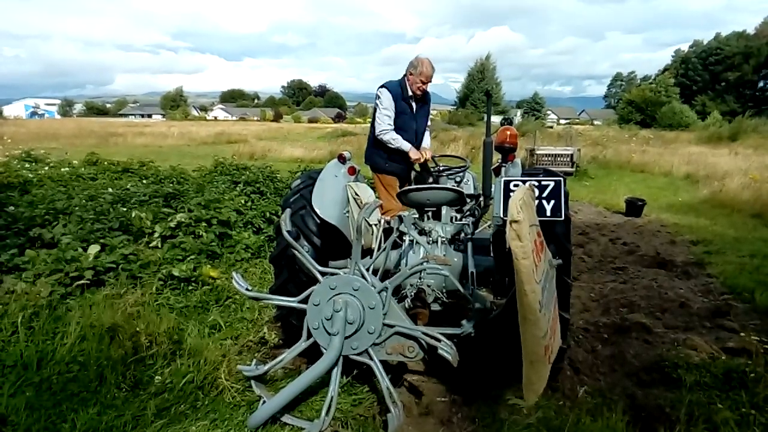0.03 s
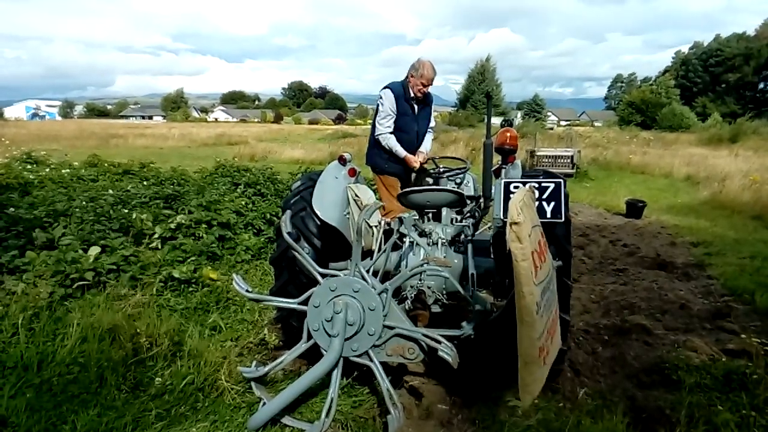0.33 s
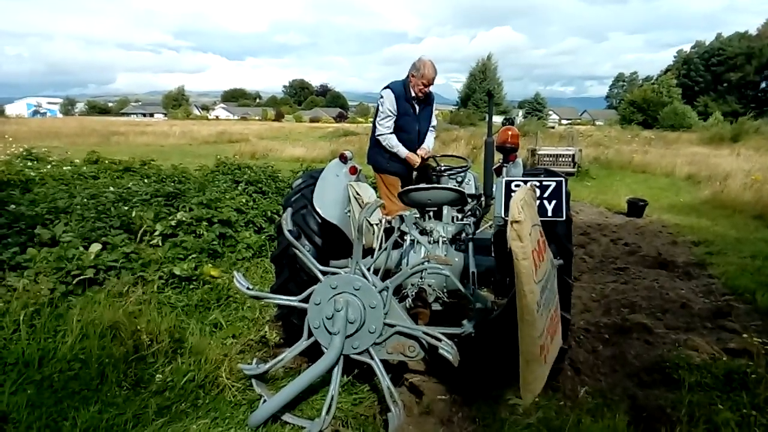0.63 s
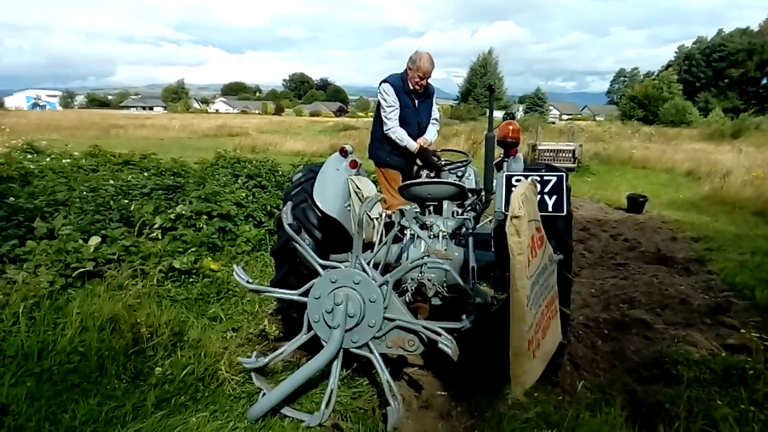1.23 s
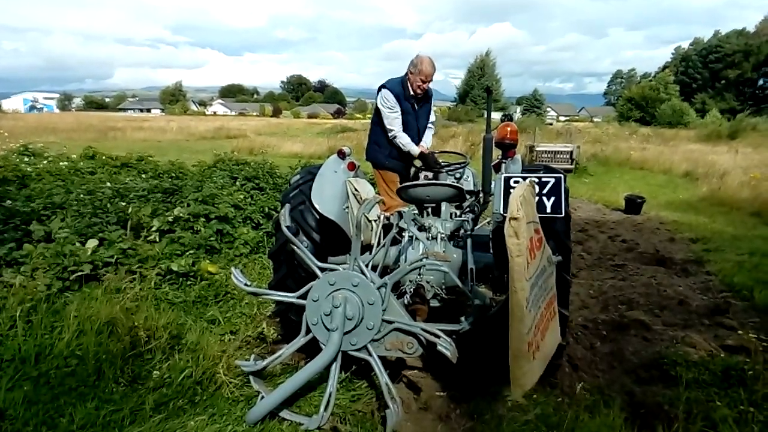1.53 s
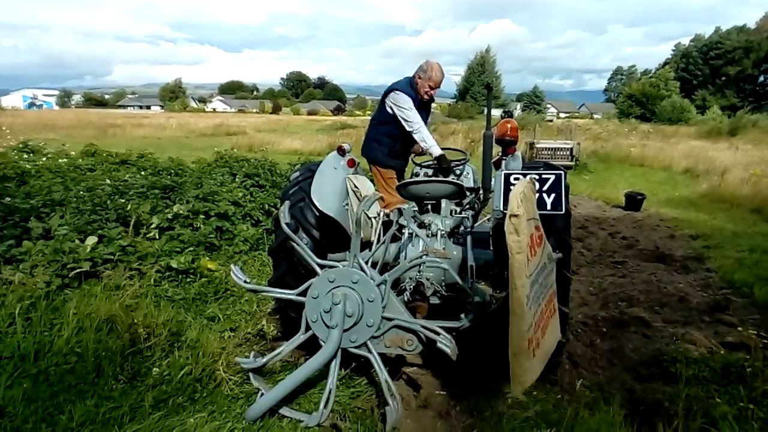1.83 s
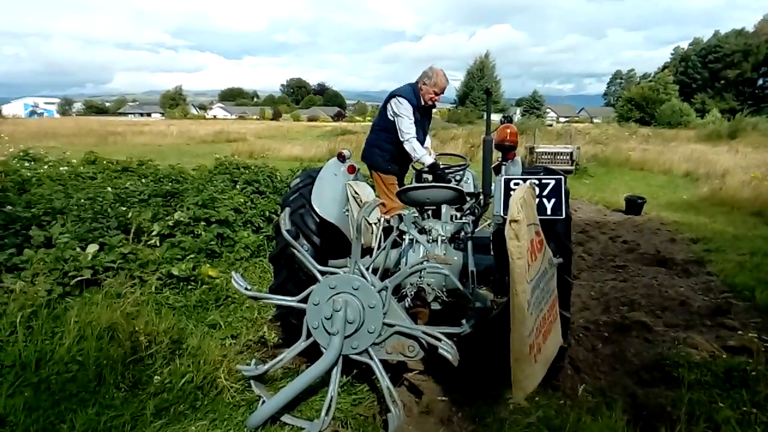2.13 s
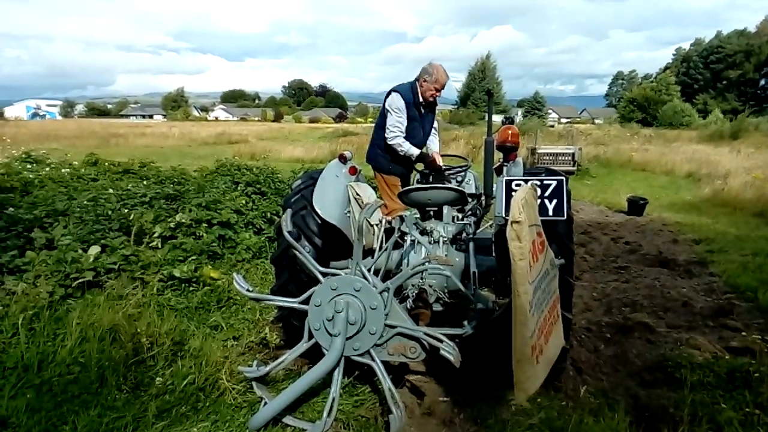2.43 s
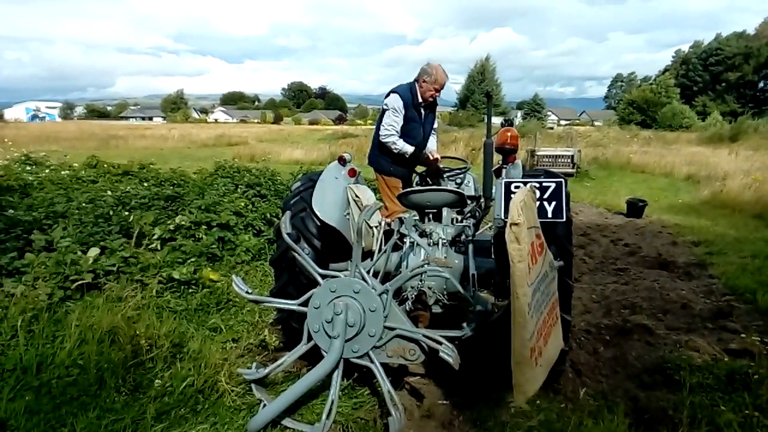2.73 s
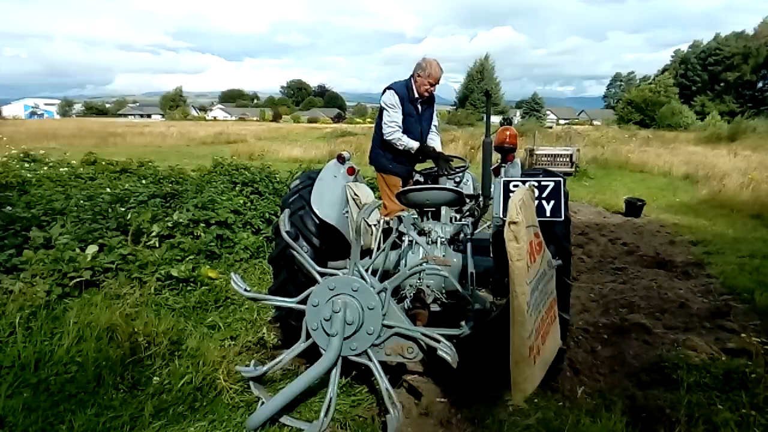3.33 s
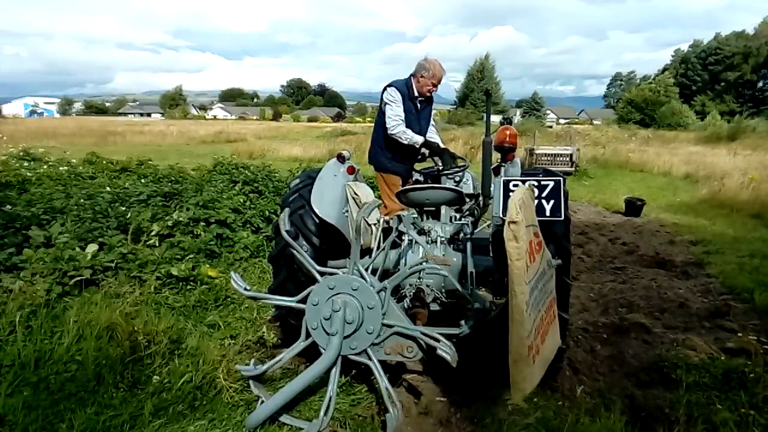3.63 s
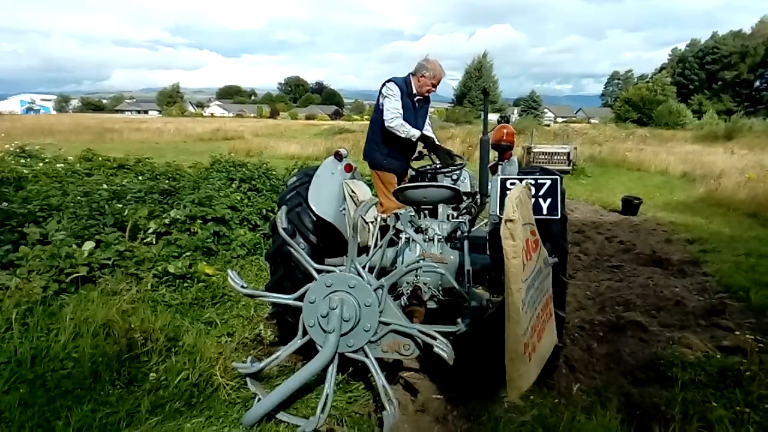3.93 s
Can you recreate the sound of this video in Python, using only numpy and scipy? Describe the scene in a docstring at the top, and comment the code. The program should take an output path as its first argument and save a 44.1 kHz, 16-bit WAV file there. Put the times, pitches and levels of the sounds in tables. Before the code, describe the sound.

A gust of wind rumbles on the microphone, followed by light puffs and a control's click.

```python
"""Wind by a parked tractor

In a field, engine off. A gust buffets the microphone with roar, flutter and slapping eddies and dies
within the first second; after that, single puffs of a light breeze thump on it. Someone at the controls
makes one sharp, ringing click, then handles them softly. Faint open air and recorder hiss lie underneath."""
import sys
import numpy as np
from scipy import signal
from scipy.fft import rfft, irfft, next_fast_len
from scipy.io import wavfile
from scipy.ndimage import uniform_filter1d, map_coordinates

SR = 44100
rng = np.random.default_rng(int(sys.argv[2]) if len(sys.argv) > 2 else 0)


def digitize_waveform(pressure):
    """Quantize a signal to 16-bit integers and store it at the path in sys.argv[1].

    Rows of a 2-D input are taken as channels; values are limited to [-1, 1].
    """
    field = np.atleast_2d(pressure).T
    bounded = np.clip(field, -1, 1)
    quanta = np.round(bounded * 32767).astype(np.int16)
    wavfile.write(sys.argv[1], SR, quanta)


N = 176400

# colour of the open air: f/Hz, level/dB
AIR_SPECTRUM = [(20, -14), (100, 0), (250, -1), (400, -2.5), (620, -1.5), (850, -3.5), (1000, -6),
                (1300, -13), (1850, -15), (2200, -32), (4000, -39.5), (8000, -80)]
# colour of the recorder's hiss: f/Hz, level/dB
HISS_SPECTRUM = [(500, -17), (3300, -9), (3700, -9.5), (4400, -9.5), (4800, -6), (5220, 0), (5650, -2.5),
                 (6400, -3), (7300, -6.5), (9200, -3), (9900, -4.5), (10700, -1.5), (11500, -7),
                 (14400, -11.5), (15400, -8)]
# drift of the hiss below and above its split: t/s, lower level/dB, upper level/dB
HISS_DRIFT = [(.4, -65.5, -65.5), (1.4, -63.5, -62), (2.1, -64.5, -64.5), (2.9, -64.5, -63.5),
              (3.7, -62, -63)]
# swells of the light breeze: t/s, level/dB
BREEZE_ENVELOPE = [(.95, -55), (1.13, -52), (1.24, -43), (1.38, -55), (1.66, -56.5), (1.79, -43.5),
                   (1.9, -40.5), (2.08, -43), (2.15, -52), (2.42, -52.5), (2.56, -44), (2.73, -50),
                   (3.0, -53), (3.42, -48), (3.56, -53.5), (3.7, -53), (3.87, -51), (4, -55.5)]
# colour of its rumble: f/Hz, level/dB
RUMBLE_SPECTRUM = [(20, 7.5), (70, 1), (110, -2.5), (160, -10.5), (250, -17.5), (400, -25), (900, -59),
                   (2000, -120)]
# puffs of wind: t/s, half-length/s, level/dB, resonance f/Hz
WIND_PUFFS = [(.428, 0.0065, -19.5, 99.5), (0.792, .018, -22.5, 145), (1.071, 0.0065, -39.5, 160),
              (1.102, 0.013, -27.5, 251), (1.937, 0.0064, -34.5, 75), (2.094, 0.013, -38, 89.5),
              (2.22, 0.013, -44, 142), (2.37, 0.012, -30.5, 160), (2.479, 0.0099, -26, 110),
              (2.508, 0.013, -33, 99), (2.634, 0.012, -33, 108), (2.677, 0.0073, -39, 131),
              (3.01, 0.0051, -41, 112), (3.241, 0.021, -34, 100), (3.28, 0.0089, -24.5, 106),
              (3.33, 0.04, -33.5, 92)]
# hands rubbing on the controls: t/s, half-length/s, level/dB
HAND_RUBS = [(1.897, 0.043, -45.5), (2.086, 0.044, -49.5), (2.216, 0.015, -55.5), (2.293, 0.0033, -45.5),
             (2.333, 0.026, -47)]
# colour of the rubbing: f/Hz, level/dB
RUB_SPECTRUM = [(100, -6.5), (300, 2.5), (600, -5), (950, -10), (1300, -21), (1900, -26.5), (2400, -41),
                (5500, -44), (8000, -78)]
# contacts at the controls: t/s, ring level/dB, ring f/Hz, snap level/dB
CONTACTS = [(1.852, -20, 488, -31), (1.854, -43, 530, -41), (1.862, -34, 570, -53), (1.871, -37, 560, -51),
            (1.8875, -34, 630, -52), (1.9219, -29, 855, -58), (1.927, -42, 945, -70),
            (2.072, -39, 630, -62), (2.178, -43.5, 830, -71), (2.293, -46, 955, -64),
            (2.319, -40.5, 840, -62)]
# colour of a contact's snap: f/Hz, level/dB
SNAP_SPECTRUM = [(200, -13), (900, 0), (1800, 6), (2300, -17), (3700, -14), (4400, -26), (5400, -11),
                 (6200, -23), (7500, -48), (12000, -70)]
# brief hoots in the gust: t/s, half-length/s, level/dB, f/Hz
GUST_HOOTS = [(0.034, 0.0033, -10, 447), (0.056, 0.0041, -18, 579.4)]
# single eddies slapping the microphone port: t/s, level/dB, half-width/ms
EDDY_SLAPS = [(0.0288, -15, .45), (.098, -16, 0.41), (0.163, -21, 1.1), (0.2392, -12.5, 0.6),
              (0.3038, -9.5, 0.44), (.388, -15, 0.39), (.502, -12.5, 0.4), (.572, -10, 0.53),
              (.7395, -15, 0.35), (0.7497, -6, 0.46), (0.7641, -8.5, 0.59), (0.773, -12.5, 1.05),
              (0.7825, -11, 0.67), (0.807, -14, 1.27), (0.8304, -14.5, 0.74), (1.093, -26, 1.1),
              (2.471, -31, 0.7), (3.336, -23, 1.76)]
# surges of the gust: t/s, body level/dB, flutter level/dB
GUST_ENVELOPE = [(0.0, -20.5, -48.5), (0.01, -30.5, -57.5), (0.032, -17.5, -33), (0.058, -23, -41.5),
                 (0.104, -17.5, -32.5), (0.138, -27, -58), (0.176, -22, -48), (0.218, -22, -52),
                 (0.264, -24.5, -57), (0.295, -23, -56.5), (0.328, -17.5, -40), (0.358, -22.5, -38.5),
                 (0.368, -20, -56), (0.398, -24.5, -51), (0.41, -15.5, -32), (0.43, -17.5, -39.5),
                 (0.478, -29.5, -64.5), (0.508, -19, -38), (0.54, -25, -44), (0.56, -26, -60.5),
                 (0.584, -20.5, -40.5), (0.598, -27.5, -63), (0.66, -29, -60.5), (0.73, -27.5, -75),
                 (0.738, -18, -37), (0.755, -22.5, -59.5), (0.785, -21, -45.5), (0.828, -22, -55),
                 (0.862, -30.5, -69.5), (0.886, -35, -86), (0.96, -65, -79)]
# how fast the eddies pass the port: t/s, relative speed
SWEEP_SPEED = [(0, 1.16), (.19, .95), (.31, 1.07), (.43, 1), (.57, 0.98), (.64, 0.77), (.69, 0.93),
               (.735, 0.98), (.76, 0.79), (.83, 0.67), (.87, 0.63), (.91, 0.2)]
# colour of the turbulence at speed 1: f/Hz, level/dB
TURBULENCE_SPECTRUM = [(20, -14), (100, 1), (170, 1.5), (300, 1.5), (480, -2.5), (700, -6), (900, -12),
                       (1120, -21), (1800, -35), (2600, -72), (4000, -120)]
# colour of the treble it tears off the port: f/Hz, level/dB
FLUTTER_SPECTRUM = [(300, -36), (700, 3.5), (1100, 0), (1550, -3.5), (1950, -8.5), (2400, -19.5),
                    (3000, -30), (3600, -51), (6000, -120)]

LOW_CUT_HZ, TOP_HZ = 72, 15550  # the microphone's bass roll-off; the recorder's band limit
TIME = np.arange(N) / SR


def amp(db):
    """Decibels to gain."""
    return 10 ** (np.asarray(db) / 20)


def unit(x):
    """Scale to rms 1."""
    return x / np.sqrt(np.mean(x ** 2) + 1e-20)


def curves(rows):
    """One envelope for each column after the time."""
    times, *columns = np.transpose(rows)
    return [np.interp(TIME, times, column) for column in columns]


def wobble(rate):
    """A smooth random curve, rate knots a second."""
    return map_coordinates(rng.standard_normal(4096), [TIME * rate], mode="wrap")


def swell(at_s, half_s):
    """A bell-shaped rise and fall around a moment."""
    return np.exp(-.5 * ((TIME - at_s) / half_s) ** 2)


def filtered(x, response):
    """Filter x by a function of frequency."""
    size = next_fast_len(N + SR // 4)
    return irfft(rfft(x, size) * response(np.fft.rfftfreq(size, 1 / SR)), size)[:N]


def coloured(x, spectrum):
    """Shape x with an EQ curve of (Hz, dB) points."""
    f, db = np.transpose(spectrum)
    return filtered(x, lambda hz: amp(np.interp(np.log(hz + 1), np.log(f + 1), db)))


def noise(spectrum):
    """Coloured noise of rms 1."""
    return unit(coloured(rng.standard_normal(N), spectrum))


def varispeed(x, speed):
    """Loop through x at a changing speed: faster is higher."""
    return map_coordinates(x, [np.cumsum(speed)], mode="wrap")


def even(x, span_s):
    """Hold a noise near rms 1 over every short span."""
    window = np.hanning(int(span_s * SR) + 3)
    power = signal.fftconvolve(x * x, window / window.sum(), "same")
    return x / np.sqrt(np.abs(power) + 1e-12)


def patchy(x, depth_db):
    """Let narrow bands of a noise drift slowly in level."""
    bands = signal.stft(x, nperseg=512)[2]
    drift = uniform_filter1d(rng.standard_normal(bands.shape), size=5, axis=0)
    drift = unit(uniform_filter1d(drift, size=40, axis=1))
    return unit(signal.istft(bands * amp(depth_db * drift), nperseg=512)[1][:N])


def port(x):
    """The microphone loses the deepest part of the wind's pressure."""
    def low_cut(hz):
        s = 1j * hz / LOW_CUT_HZ
        return s ** 2 / (1 + 1.2 * s + s ** 2) * s / (0.5 + s)
    return filtered(x, low_cut)


def open_air(level_db=-59):
    """A distant bed of air, gently breathing."""
    return amp(level_db + 0.74 * wobble(5.16)) * patchy(noise(AIR_SPECTRUM), depth_db=1.0)


def recorder_hiss(split_hz=5900, whine_hz=12897, whine_db=-89):
    """Faint hiss, drifting in two bands, with a thin steady whine."""
    lower_db, upper_db = curves(HISS_DRIFT)
    hiss = patchy(noise(HISS_SPECTRUM), depth_db=1.6)
    lower = filtered(hiss, lambda hz: hz < split_hz)
    whine = unit(np.sin(2 * np.pi * whine_hz * TIME))
    return amp(lower_db) * lower + amp(upper_db) * (hiss - lower) + amp(whine_db) * whine


def breeze(trim_db=-2.0, unsteady_db=3.5):
    """The low, uneven rumble of light air on the microphone."""
    level_db, = curves(BREEZE_ENVELOPE)
    rumble = even(port(noise(RUMBLE_SPECTRUM)), span_s=0.2)
    return rumble * amp(level_db + trim_db + unsteady_db * wobble(28.27))


def puffs(q=1.6, muffle_hz=200):
    """Short parcels of turbulence thump on the microphone, each around its own pitch."""
    out = np.zeros(N)
    for at_s, half_s, db, pitch_hz in WIND_PUFFS:
        def thump(hz):
            return 1 / (1 + 1j * hz / pitch_hz / q - (hz / pitch_hz) ** 2) / (1 + 1j * hz / muffle_hz)
        air = port(filtered(rng.standard_normal(N), thump))
        out += amp(db) * swell(at_s, half_s) * even(air, span_s=0.038)
    return out


def rubbing():
    """Hands brush the controls in soft, grainy strokes."""
    strokes = sum(amp(db) * swell(at_s, half_s) for at_s, half_s, db in HAND_RUBS)
    return strokes * noise(RUB_SPECTRUM) * unit(amp(1.9 * wobble(140)))


def clicks(ring_t60_s=0.032, clack_hz=1420, clack_over_snap_db=6.5, clack_t60_s=0.0042,
           snap_t60_s=0.012, tail_db=-24, tail_t60_s=0.27):
    """Each contact snaps and rings briefly in a damped part; the lever's upper mode adds a clack."""
    rings, snaps = np.zeros(N), np.zeros(N)
    for at_s, ring_db, ring_hz, snap_db in CONTACTS:
        t = np.maximum(TIME - at_s, 0)
        ring = amp(ring_db - 60 * t / ring_t60_s) * np.sin(2 * np.pi * ring_hz * t)
        clack = amp(snap_db + clack_over_snap_db - 60 * t / clack_t60_s) * np.sin(2 * np.pi * clack_hz * t)
        attack = 1 - np.exp(-t / 0.00029)
        rings += (ring + clack) * attack
        t = TIME - at_s + 0.00089  # the snap just leads the ring
        decay = amp(-60 * np.abs(t) / snap_t60_s) + amp(tail_db - 60 * np.abs(t) / tail_t60_s)
        snaps += amp(snap_db) * (t > 0) * decay * even(noise(SNAP_SPECTRUM), span_s=0.0042)
    return rings + filtered(snaps, lambda hz: 1 / (1 + (hz / 6500) ** 12))


def hoots():
    """For a few cycles the rushing air settles on one pitch."""
    return sum(amp(db) * swell(at_s, half_s) * np.sin(2 * np.pi * (hz * TIME + rng.random()))
               for at_s, half_s, db, hz in GUST_HOOTS)


def slaps(push_width=0.9, suction_width=0.58):
    """Each eddy is a crested push, then a rounder suction; the wider it is, the duller its edge."""
    out = np.zeros(N)
    for at_s, db, half_ms in EDDY_SLAPS:
        half_s = half_ms / 1000
        push = np.exp(-np.abs(TIME - at_s + half_s) / (half_s * push_width))
        suction = swell(at_s + half_s, half_s * suction_width)
        edge_hz = 1350 / half_ms ** 0.44

        def band(hz):
            return hz / np.hypot(hz, LOW_CUT_HZ) / np.sqrt(1 + (hz / edge_hz) ** 10)
        out += amp(db) * filtered(push - suction, band)
    return out


def gust(trim_db=0.18, lumpy_db=3.0, ragged_db=2.2, base_tears_per_s=1300, db_per_octave=65):
    """Eddies sweep over the port: slower ones roar deeper, and the hardest tear off in a flutter."""
    body_db, flutter_db = curves(GUST_ENVELOPE)
    speed, = curves(SWEEP_SPEED)
    roar = port(varispeed(noise(TURBULENCE_SPECTRUM), speed))
    lumps = wobble(170)
    body = even(roar * amp(lumpy_db * lumps), span_s=0.027) * amp(body_db + trim_db)
    impulses = (rng.random(N) < base_tears_per_s / SR) * rng.standard_normal(N)
    tear_speed = 2 ** ((flutter_db + 37) / db_per_octave)  # louder is brighter and denser
    tears = varispeed(coloured(impulses, FLUTTER_SPECTRUM), tear_speed)
    flutter = even(tears * amp(ragged_db * lumps), span_s=0.076) * amp(flutter_db)
    fade_out = np.clip((GUST_ENVELOPE[-1][0] - TIME) / 0.042, 0, 1)
    lull = amp(-16 * swell(at_s=0.652, half_s=0.0079))  # it falters before the last surge
    return (body + flutter) * fade_out * lull


def scene():
    """Mono mix of wind on the microphone, the controls and the quiet bed."""
    wind = gust() + breeze() + puffs() + slaps() + hoots()
    controls = clicks() + rubbing()
    return (wind + controls + open_air() + recorder_hiss())[None]


def record(dry):
    """The recorder keeps nothing above its band limit."""
    return filtered(dry[0], lambda hz: hz < TOP_HZ)[None]


dry = scene()
out = record(dry)
digitize_waveform(out)
```